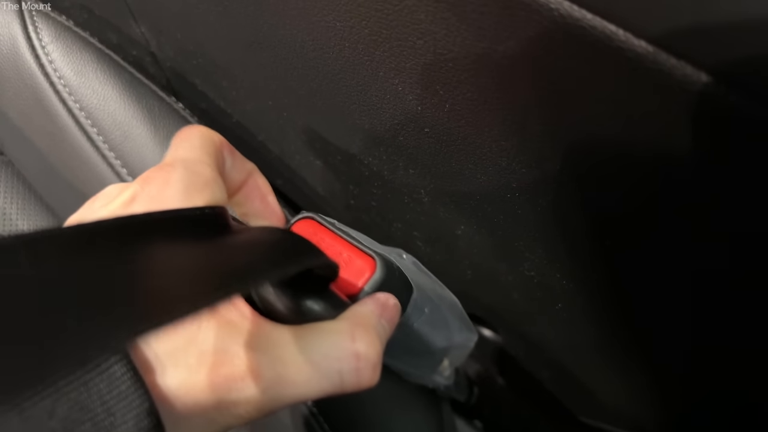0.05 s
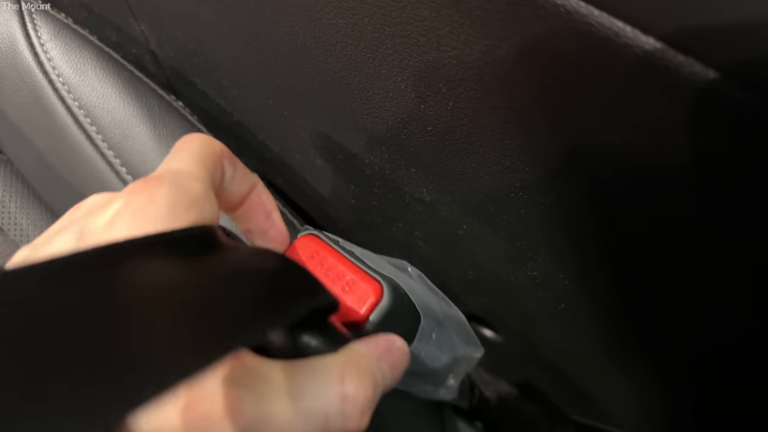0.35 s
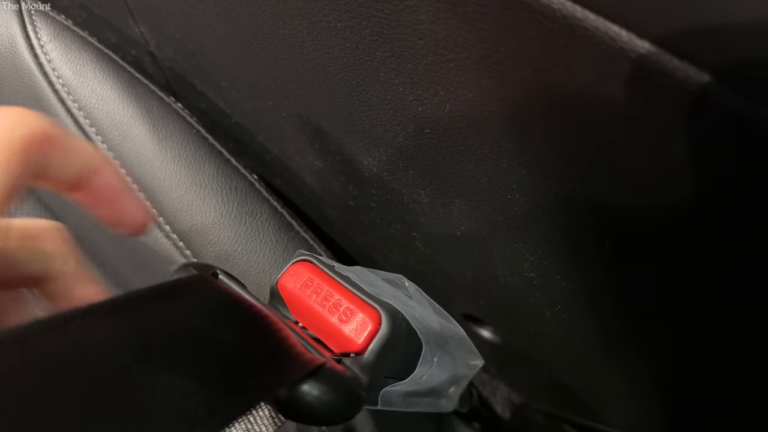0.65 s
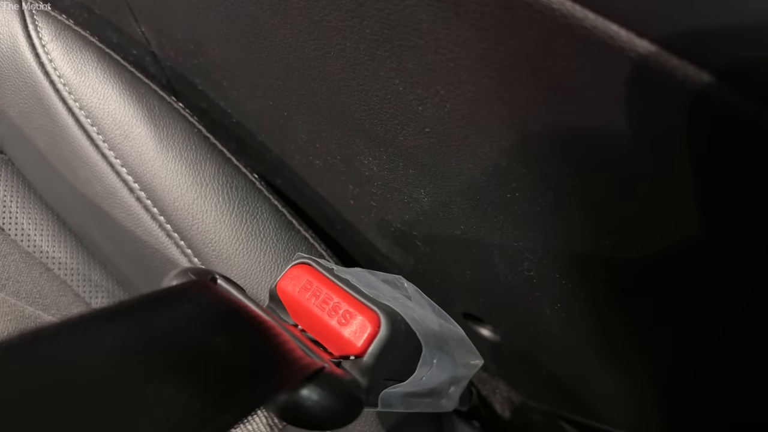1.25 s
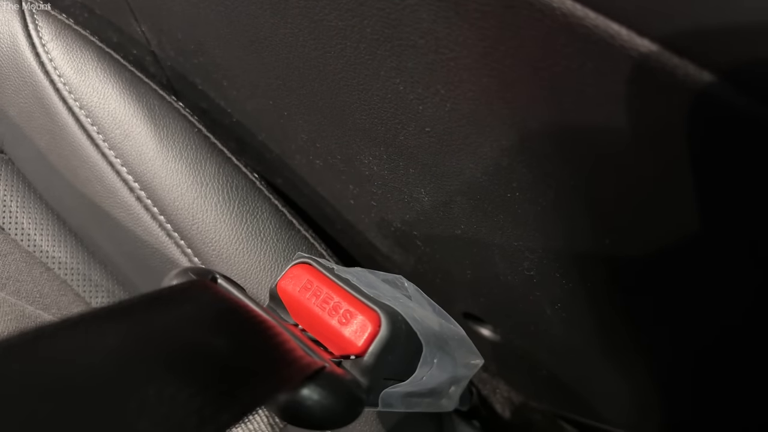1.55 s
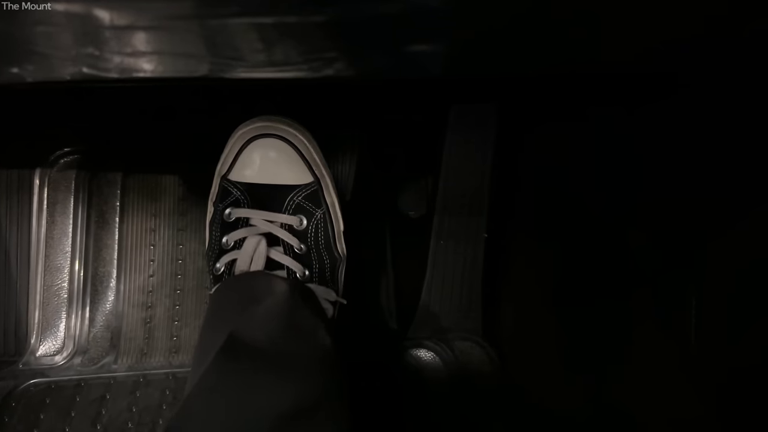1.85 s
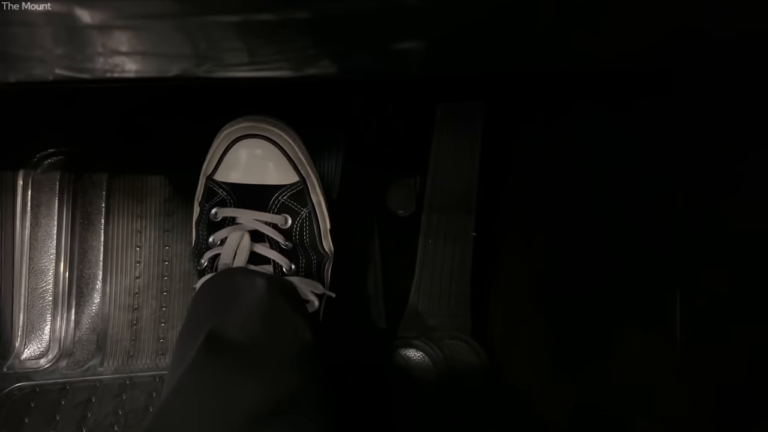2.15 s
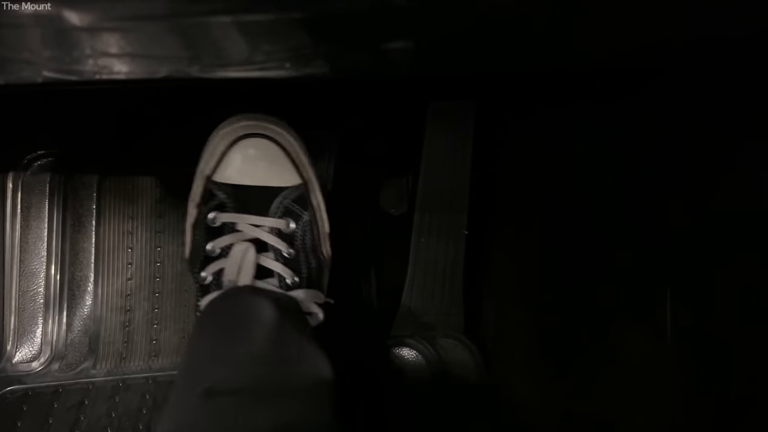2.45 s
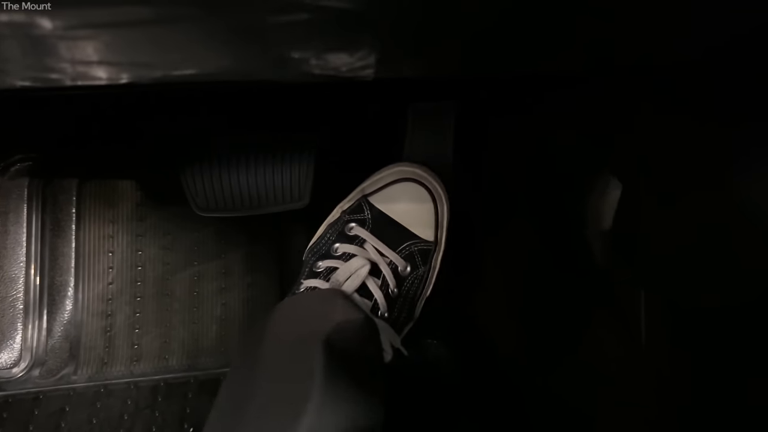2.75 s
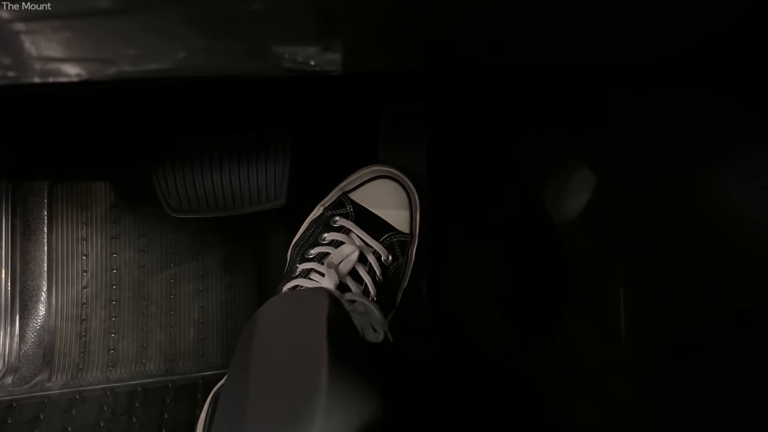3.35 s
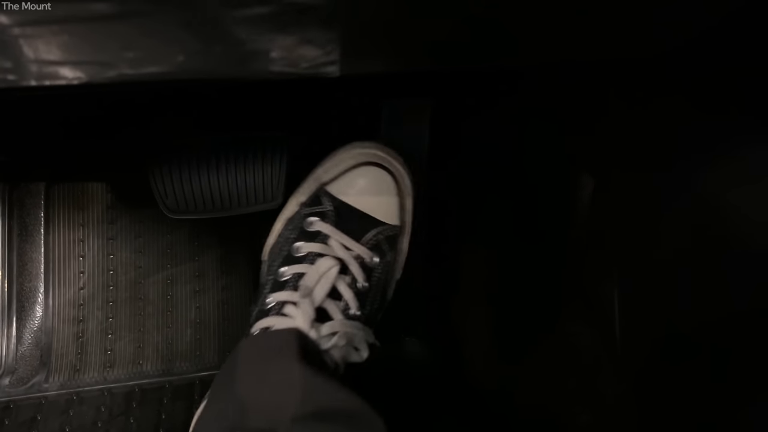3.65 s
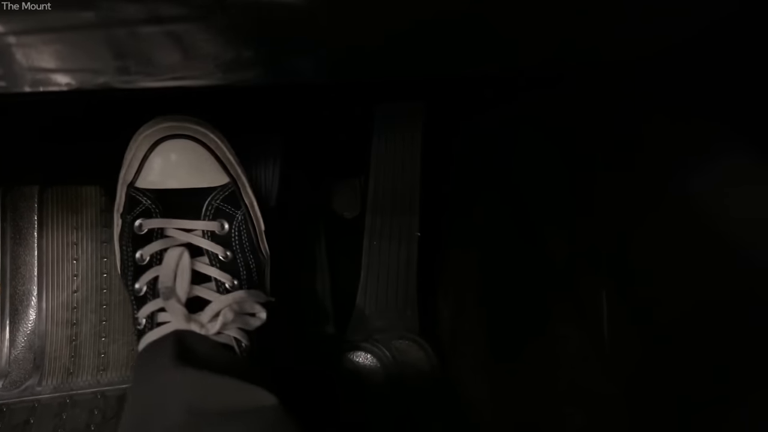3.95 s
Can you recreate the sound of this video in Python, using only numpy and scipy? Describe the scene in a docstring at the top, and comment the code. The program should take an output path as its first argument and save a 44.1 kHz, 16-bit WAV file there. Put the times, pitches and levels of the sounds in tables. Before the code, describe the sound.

Seat belt latching with sharp clicks, followed by dull pedal thumps inside a quiet car.

```python
"""Inside a parked car, a stereo pair of microphones close to the seat belt buckle.
The steel tongue strikes the buckle and slides in; the latch snaps shut and the metal rings.
Then, down in the footwell, a rubber-soled shoe works the pedals: dull knocks boom through the
floor panel, the sole scuffs across the tread, and a pedal clacks against its stops.
Underneath lie the low rumble of the car body and a faint hiss."""
import sys
import numpy as np
from scipy import signal
from scipy.fft import rfft, irfft
from scipy.io import wavfile
from scipy.ndimage import uniform_filter1d

SR = 44100
rng = np.random.default_rng(int(sys.argv[2]) if len(sys.argv) > 2 else 0)


def store_wav(level_fs):
    """Save 16-bit WAV to argv[1]."""
    pcm = np.round(np.clip(np.atleast_2d(level_fs), -1, 1) * 32767)
    wavfile.write(sys.argv[1], SR, pcm.T.astype(np.int16))


N = 176400
T = np.arange(N) / SR
RING_T = T[:SR // 3]  # time axis of one blow and its decay
BELT_WET_DB, PEDAL_WET_DB = -12, -11  # cabin reflections against the direct sound


def buckle(steel_db=-20):
    """Close up: the tongue strikes and slides, the latch snaps, and the steel rings on."""
    # tongue striking the buckle: start_s, level_db, decay_s
    strike_hits = [(.0203, -9.5, 0.0018), (.0230, -22, 0.0019)]
    # latch catching and snapping home: start_s, level_db, decay_s
    snap_hits = [(.2035, -65.5, 0.0012), (.2432, -38, 0.0016), (.2473, -29.5, 0.0016), (.2525, -28, 0.0023),
                 (.255, -39.5, 0.0035), (.2610, -17.5, 0.00087), (.2625, -17.5, 0.0022),
                 (.2655, -21.5, 0.0021)]
    # tongue jolting deeper into the slot: start_s, level_db, decay_s
    jolt_hits = [(.0118, -29.5, .002), (.0385, -25, 0.0018), (.0793, -34.5, 0.0026)]
    # tongue scraping along the slot: time_s, level_db
    slide_curve = [(0, -40), (.009, -41), (.013, -33), (.019, -30), (.029, -30.5), (.035, -30.5),
                   (.042, -33.5), (.05, -36), (.058, -50.5), (.076, -51.5), (.088, -55.5), (.105, -69),
                   (.15, -80.5), (.215, -78), (.24, -59), (.26, -58.5), (.29, -65), (.33, -68.5),
                   (.4, -110)]
    # buckle shell under the strike: frequency_hz, gain_db
    strike_colour = [(120, -39.5), (300, -22), (650, -14.5), (900, -9.5), (1150, -1.5), (1500, -11),
                     (1900, 1.5), (2380, -18), (2800, -5.5), (4040, -15.5), (4600, -6), (5100, -11),
                     (5520, -6), (6520, -8.5), (7830, -19.5), (9930, -4.5), (11300, -13.5), (12500, -4.5),
                     (16000, -24)]
    # shell under the latch: frequency_hz, gain_db
    snap_colour = [(120, -48), (200, -14.5), (700, -25.5), (920, -14.5), (1250, 2), (1370, -7.5),
                   (1490, 1.5), (1750, -11), (2000, -8), (2300, -17), (2540, -3.5), (2800, -11.5),
                   (3020, -2.5), (3250, -12.5), (3800, -14), (4200, -22), (4520, -15), (6520, -13),
                   (7680, -18), (9930, -11.5), (11300, -32.5), (12700, -23), (16000, -27.5)]
    # shell under the scrape: frequency_hz, gain_db
    slide_colour = [(120, -28.5), (200, -8), (387, -10), (519, -24), (1040, -3), (1710, -3.5), (2250, -16),
                    (2700, -7), (4200, -15), (5520, -7), (7410, -22), (10100, -21.5), (16000, -43.5)]
    # modes of the steel tongue and spring: pitch_hz, level_db, t60_s
    steel_modes = [(650, -19, .35), (1120, -2, .08), (1275, -5, .36), (1484, -1, .12), (1940, -5, .09),
                   (2514, -4, .1), (2752, -3, .12), (2985, -1, .12), (3430, -13, .22), (3635, -9, .14),
                   (4540, -5, .11), (5370, -2, .13), (5680, -5, .11), (6680, -6, .11), (8240, -10, .08),
                   (10200, -9, .06)]
    # buckle's balance at the microphones: frequency_hz, left_over_right_db
    balance = [(200, 1), (1200, 1.5), (1800, 8), (3000, -3.5), (4500, 8), (6000, 7.5), (7500, 14),
               (9000, -1.5), (16000, -2.5)]
    strikes, snaps = clicks(strike_hits), clicks(snap_hits)
    slide = friction() * envelope(slide_curve) + clicks(jolt_hits)
    shell = colour(strikes, strike_colour) + colour(snaps, snap_colour) + colour(slide, slide_colour)
    steel = sum(amp(db - 60 * RING_T / t60) * np.cos(2 * np.pi * hz * RING_T)
                for hz, db, t60 in steel_modes)
    ring = convolve(.5 * strikes + snaps + slide, steel / np.linalg.norm(steel))
    out = in_cabin(shell + amp(steel_db) * ring, BELT_WET_DB)
    side_db = at_hz(balance, np.fft.rfftfreq(2 * N, 1 / SR))
    return irfft(rfft(out, 2 * N) * amp([side_db / 2, -side_db / 2]))[:, :N]


def pedals(knock_delay_s=.0011, boom_delay_s=.005, tick_peak_db=13, tick_octaves=.2):
    """In the footwell each blow ticks and clacks in the pedal, knocks in its arm, booms in the floor."""
    # shoe and pedal blows: start_s, boom_db, knock_db, knock_ratio, clack_db, clack_hz, tick_db, tick_hz
    blows = [(1.603, -53, -70, 0.88, -77.5, 598, -90, 2000),
             (1.882, -31.5, -55, 1.01, -77, 598, -93.5, 2000),
             (1.9488, -23.5, -26.5, 1.12, -42.5, 548, -53, 1940),
             (2.166, -43, -62, 1.1, -63.5, 590, -62.5, 2205), (2.226, -65, -71, 0.83, -71, 600, -66, 2000),
             (2.272, -42, -50.5, 1.12, -59, 550, -64.5, 8600),
             (2.35, -21.5, -31, 0.97, -44.5, 555, -60.5, 1440),
             (2.413, -22, -29, 1.01, -41.5, 550, -53, 1300),
             (2.468, -23, -26, 0.9, -39.5, 463, -56.5, 1820),
             (2.55, -43, -43.5, 0.91, -34.5, 611, -59, 2460),
             (2.8679, -33.5, -26, 0.96, -21.5, 808, -28, 1737),
             (3.5483, -21, -23.5, .88, -30.5, 700, -32, 2520),
             (3.028, -64, -57, 1.066, -52, 660, -55, 2330), (3.768, -69, -71, 2.1, -49, 647, -54, 1303),
             (3.8998, -41, -26.5, 0.99, -45.5, 580, -48.5, 950),
             (3.91, -26, -23.5, 0.96, -44.5, 564, -48.5, 930), (3.923, -23, -31, 0.93, -46, 756, -65, 1000)]
    # floor panel modes: pitch_hz, level_db, swell_s
    floor_modes = [(91.1, -2.5, 0.021), (61.1, -14.5, 0.031), (121.8, -15.5, 0.023), (92.4, -22.5, 0.057)]
    # pedal arm modes: pitch_hz, level_db, swell_s
    arm_modes = [(164.6, -9.5, 0.017), (262.4, -4.5, 0.014), (301.2, -6, 0.011), (369.8, -11, 0.0099)]
    # spectrum of the pedal's clack: ratio_to_clack_hz, gain_db
    clack_shape = [(.15, -16.5), (.55, -7.5), (.8, -6), (.97, 0), (1.1, -3.5), (1.3, -12.5), (2.2, -29),
                   (6, -56.5), (30, -85)]
    # spectrum common to all ticks: frequency_hz, gain_db
    tick_colour = [(200, -27.5), (1100, -0.5), (2000, -9), (2700, -2.5), (3800, -9.5), (5000, -17),
                   (10000, -28), (16000, -37.5)]
    low, high = np.zeros((2, N)), np.zeros((2, N))
    hz = np.fft.rfftfreq(N, 1 / SR)[1::16]
    for start_s, boom_db, knock_db, knock_ratio, clack_db, clack_hz, tick_db, tick_hz in blows:
        add(low, start_s + boom_delay_s, amp(boom_db) * thud(floor_modes))
        add(low, start_s + knock_delay_s, amp(knock_db) * thud(arm_modes, knock_ratio))
        clack_colour = [(ratio * clack_hz, db) for ratio, db in clack_shape]
        add(high, start_s, amp(clack_db) * colour(contact(decay_s=.006), clack_colour))
        peak_db = tick_peak_db * np.exp(-(np.log2(hz / tick_hz) / tick_octaves) ** 2)
        peaked_colour = np.c_[hz, at_hz(tick_colour, hz) + peak_db]
        add(high, start_s, amp(tick_db) * colour(contact(decay_s=.0034), peaked_colour))
    return low + in_cabin(high, PEDAL_WET_DB) * lean_left(1)


def seat():
    """The buckle's stalk bumps the leather cushion: a soft thud with a pat on top."""
    # stalk meeting the seat: start_s, thud_db, pat_db
    bumps = [(.026, -34.5, -60), (.066, -46, -50), (0.269, -36, -59), (.522, -46, -50),
             (0.805, -46.5, -65.5)]
    # cushion modes: pitch_hz, level_db, swell_s
    cushion_modes = [(95, -10, .014), (148, 1, 0.0091), (205, -6.5, .012), (290.3, -12.5, .01),
                     (370, -11, .008)]
    # pat on leather: frequency_hz, gain_db
    pat_colour = [(100, -10), (330, 2), (700, -10), (1400, -8), (3500, -21), (6000, -31), (16000, -42.5)]
    out = np.zeros((2, N))
    for start_s, thud_db, pat_db in bumps:
        add(out, start_s, amp(thud_db) * thud(cushion_modes))
        add(out, start_s, amp(pat_db) * colour(contact(decay_s=.017), pat_colour))
    return out


def scuffs(rise_s=.0066, fade_db=-30, stick_slip_hz=350, jitter=.5):
    """The rubber sole sticks and slips over the pedal's ribs in short strokes."""
    # sole crossing the tread: start_s, length_s, level_db
    strokes = [(2.537, 0.034, -62.5), (2.579, 0.058, -50), (2.634, 0.076, -53.5), (2.727, 0.0079, -48.5),
               (3.065, 0.01, -53)]
    # rubber on the tread: frequency_hz, gain_db
    scuff_colour = [(200, -29), (700, 3), (1400, -8.5), (2000, -8), (2350, 2), (2800, -13), (3600, -1),
                    (4150, -9), (4600, 5), (5250, -4), (5800, 3.5), (7000, 1), (7550, -9), (8600, -7.5),
                    (11000, -13), (14500, -25), (16000, -29)]
    force = np.zeros((1, N))
    for start_s, length_s, db in strokes:
        t = np.arange(0, length_s, 1 / SR)
        add(force, start_s, np.minimum(t / rise_s, 1) * amp(db + fade_db * (t / length_s) ** 2))
    slip_hz = stick_slip_hz * np.exp(jitter * wander(samples=60))
    slip_count = np.floor(np.cumsum(slip_hz) / SR)
    slips = np.diff(slip_count, prepend=0) * noise()  # one impulse of random strength per slip
    out = colour((slips / slips.std() + noise()) * force, scuff_colour)
    return in_cabin(out, PEDAL_WET_DB) * lean_left(2.5)


def webbing(decay_s=.00083):
    """Fine ticks as the hand lets go and the belt takes up its slack."""
    # ticks of webbing and fingers: start_s, level_db
    ticks = [(.403, -66), (.457, -61), (.480, -64), (0.512, -63), (.550, -59)]
    # spectrum of those ticks: frequency_hz, gain_db
    tick_colour = [(300, -15), (1500, -5), (3500, -11), (6000, -25), (13000, -1), (16000, -8)]
    train = clicks([(start_s, db, decay_s) for start_s, db in ticks])
    return in_cabin(colour(train, tick_colour), BELT_WET_DB)


def hiss_swells(grain=.3, uneven_db=2.2):
    """Soft, uneven hiss that swells and fades around the clicks and knocks."""
    # swells, rising before the start and falling after the end: start_s, end_s, level_db, rise_s, fall_s
    swells = [(0.244, 0.527, -72, .02, 0.081), (0.622, 0.722, -72.5, 0.11, .1),
              (1.089, 1.133, -76.5, 0.042, 0.025), (1.939, 1.995, -62, 0.12, 0.15),
              (2.456, 2.616, -62.5, 0.17, 0.031), (2.638, 3.066, -63.5, .05, 0.1),
              (3.504, 3.545, -67.5, 0.084, .02), (3.515, 3.544, -55.5, 0.03, 0.01),
              (3.553, 4, -66, 0.04, .1)]
    # spectrum of the swelling hiss: frequency_hz, gain_db
    swell_colour = [(240, -35.5), (400, -4.5), (676, -6.5), (742, -11.5), (893, -12), (1070, -15.5),
                    (1200, -11.5), (2250, -14), (3530, -21), (6640, -20.5), (7630, -27), (8500, -21),
                    (16000, -39.5)]
    gain = np.zeros(N)
    for start_s, end_s, db, rise_s, fall_s in swells:
        ramp = np.minimum(1 + (T - start_s) / rise_s, 1 - (T - end_s) / fall_s)
        gain += amp(db) * np.clip(ramp, 0, 1) ** 1.14
    flicker = amp(uneven_db * wander(samples=1100))
    texture = noise() + grain * friction()
    return colour(texture * gain * flicker, swell_colour) * lean_left(2)


def background(hiss_db=-77.5):
    """Low rumble of the car body, the floor's drone under the moving pedal, and a faint steady hiss."""
    # swell of the body rumble: time_s, level_db
    rumble_curve = [(0, -55.5), (.35, -57), (.7, -60.5), (1, -63), (1.57, -66), (1.62, -54), (1.83, -53),
                    (2.02, -46), (2.2, -57.5), (2.33, -47), (2.55, -38.5), (2.72, -54.5), (2.85, -49.5),
                    (2.95, -45), (3.13, -55), (3.45, -55), (3.64, -47), (3.87, -53.5), (4, -40)]
    # body rumble: frequency_hz, gain_db
    rumble_colour = [(15, -32.5), (30, -9), (45, 1.5), (65, 2), (100, -4), (135, -11), (200, -16),
                     (300, -18), (450, -31), (1000, -50.5), (4000, -94)]
    # swell of the floor drone as the pedal travels: time_s, level_db
    drone_curve = [(2.5, -80.5), (2.58, -47), (2.76, -44.5), (2.86, -82), (2.95, -90)]
    # narrow floor resonance: frequency_hz, gain_db
    drone_colour = [(20, -49.5), (90, -21.5), (102, -3), (109, 3), (116, -9), (135, -24), (600, -66.5)]
    # steady hiss: frequency_hz, gain_db
    hiss_colour = [(180, -28), (300, -3), (689, -12), (1460, -5.5), (1840, -11), (2070, -17), (2170, -15),
                   (5250, -19.5), (6100, -17.5), (7320, -22.5), (8500, -18), (10200, -31.5), (16000, -21.5)]
    rumble = colour(noise(), rumble_colour, size=16384) * envelope(rumble_curve)
    drone = colour(noise(), drone_colour, size=16384) * envelope(drone_curve)
    hiss = amp(hiss_db) * colour(noise(), hiss_colour)
    return (rumble + drone + hiss) * lean_left(1)


def in_cabin(direct, wet_db, size=256, onset_s=.004):
    """The direct sound plus the short, padded reflections of the car's interior."""
    # cabin decay: frequency_hz, t60_s
    decay = [(100, .16), (1200, 0.072), (4000, 0.062), (9000, 0.074), (16000, .06)]
    hz, t, spectra = signal.stft(rng.standard_normal((2, len(RING_T))), SR, nperseg=size)
    spectra *= amp(-60 * t / at_hz(decay, hz)[:, None])
    tail = signal.istft(spectra, SR, nperseg=size)[1][:, :len(RING_T)]
    tail *= np.minimum(RING_T / onset_s, 1) ** 2
    return direct + amp(wet_db) * convolve(direct, tail / np.linalg.norm(tail[0]))


def contact(decay_s, passes=6):
    """A brief chatter of two surfaces meeting, even in spectrum."""
    fade = np.exp(-RING_T / decay_s)
    burst = noise(len(RING_T)) * fade
    for _ in range(passes):  # flatten the spectrum, then trim the tail again
        flat = np.exp(1j * np.angle(rfft(burst)))
        burst = irfft(flat, len(RING_T)) * np.minimum(1, 10 * fade)
    return burst * np.linalg.norm(fade) / np.linalg.norm(burst, axis=1, keepdims=True)


def clicks(hits):
    """A train of hard contacts."""
    out = np.zeros((2, N))
    for start_s, db, decay_s in hits:
        add(out, start_s, amp(db) * contact(decay_s))
    return out


def thud(modes, pitch_ratio=1, spread_rad=.2):
    """Damped low modes that swell and die, slightly out of phase between the microphones."""
    out = 0
    for hz, db, swell_s in modes:
        age = RING_T / swell_s
        swell = (age * np.exp(1 - age)) ** 3  # peaks at swell_s
        phase = rng.normal(0, spread_rad, (2, 1))
        out = out + amp(db) * swell * np.sin(2 * np.pi * hz * pitch_ratio * RING_T + phase)
    return out * lean_left(2)


def friction(slips_per_s=1500, share=.46):
    """Tiny slips over a smooth hiss."""
    slips = rng.standard_normal(N) * (rng.random(N) < slips_per_s / SR)
    return share * slips / slips.std() + np.sqrt(1 - share ** 2) * noise()


def noise(n=N):
    """White noise as two close microphones hear it, most alike in the bass."""
    # likeness of left and right: frequency_hz, correlation
    likeness = [(30, .98), (120, .93), (400, .85), (900, .65), (2000, .15), (5000, .05), (9000, .45),
                (13000, .75)]
    left, other = rfft(rng.standard_normal((2, n)))
    same = at_hz(likeness, np.fft.rfftfreq(n, 1 / SR))
    return irfft([left, same * left + np.sqrt(1 - same ** 2) * other], n)


def wander(samples):
    """Smoothed random drift of unit variance."""
    return uniform_filter1d(rng.standard_normal(N), samples) * np.sqrt(samples)


def colour(x, points, size=4096):
    """Applies a minimum-phase filter of unit energy with the given spectral shape."""
    log_gain = np.log(amp(at_hz(points, abs(np.fft.fftfreq(size, 1 / SR)))))
    response = np.exp(np.conj(signal.hilbert(log_gain)))
    taps = np.fft.ifft(response).real[:size // 2]
    return convolve(x, taps / np.linalg.norm(taps))


def convolve(x, taps):
    """Filters both channels and keeps the length."""
    return signal.fftconvolve(x, np.atleast_2d(taps), axes=1)[:, :x.shape[1]]


def amp(db):
    """Decibels to gain."""
    return 10 ** (np.asarray(db) / 20)


def lean_left(db):
    """Gains that raise the left microphone and lower the right by db each."""
    return amp([[db], [-db]])


def at_hz(points, hz):
    """A table's value on a log-frequency axis."""
    table_hz, value = np.transpose(points)
    return np.interp(np.log(hz + 1e-6), np.log(table_hz), value)


def envelope(points):
    """A time_s, level_db curve as gain."""
    return amp(np.interp(T, *np.transpose(points)))


def add(mix, start_s, sound):
    """Mixes a sound in at start_s."""
    part = mix[:, round(start_s * SR):][:, :sound.shape[-1]]
    part += sound[..., :part.shape[1]]


def scene():
    """Belt, then pedals, in the quiet cabin."""
    return buckle() + seat() + webbing() + pedals() + scuffs() + hiss_swells() + background()


def record(dry):
    """The recorder's band limit."""
    edge_hz = 15900
    lowpass = signal.firwin(511, edge_hz, window=("kaiser", 9), fs=SR)
    return signal.oaconvolve(dry, lowpass[None], "same")


dry = scene()
out = record(dry)
store_wav(out)
```